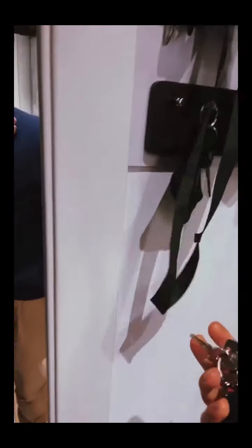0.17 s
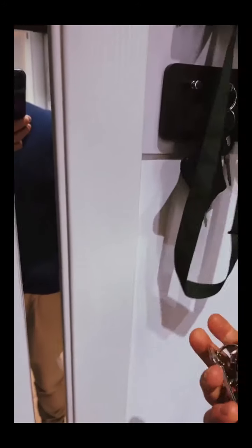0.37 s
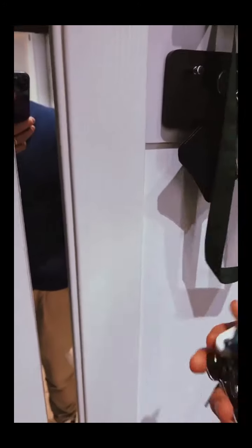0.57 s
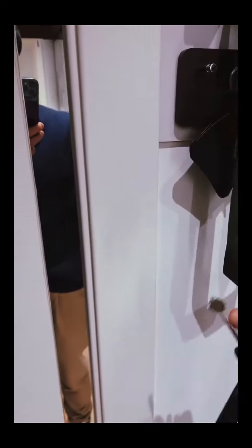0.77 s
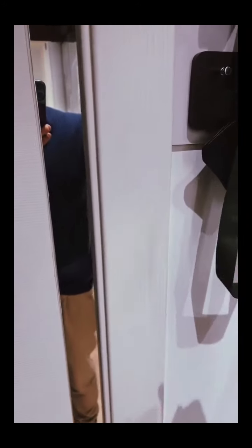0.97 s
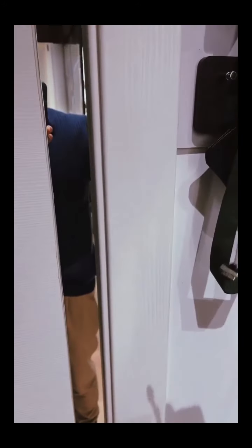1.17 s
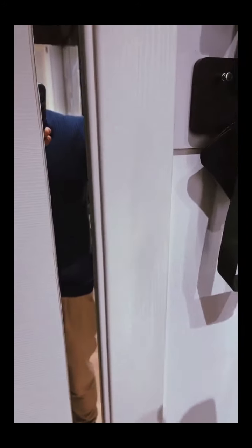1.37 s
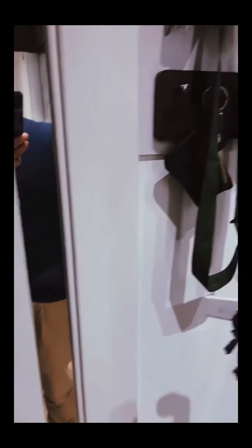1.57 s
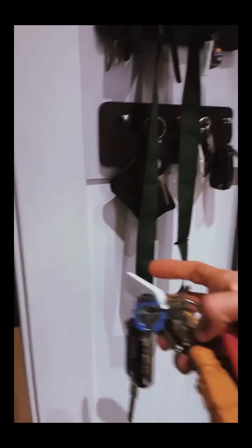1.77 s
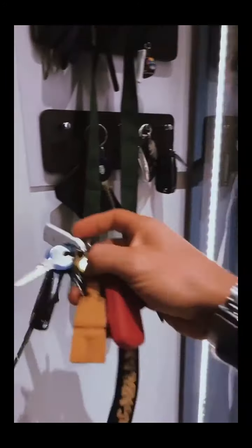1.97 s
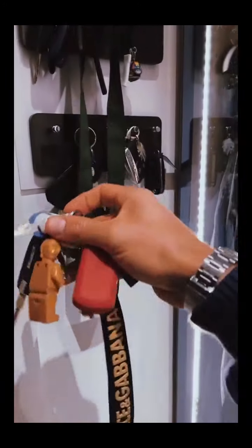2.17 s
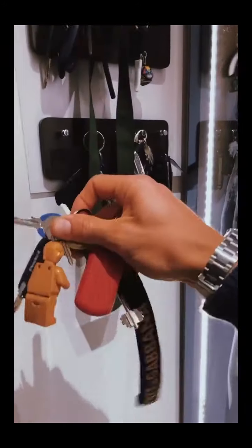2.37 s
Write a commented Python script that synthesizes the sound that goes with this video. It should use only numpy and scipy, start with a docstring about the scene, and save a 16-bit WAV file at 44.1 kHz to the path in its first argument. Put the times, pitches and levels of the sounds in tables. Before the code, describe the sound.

A bunch of keys with plastic fobs clinks and slides in a hand, close by in a small, quiet hallway. The light jingling eases briefly, then grows loudest near the end, with a few soft thumps from a lanyard.

```python
"""A bunch of keys with plastic fobs is gathered in the hand and lifted off a wall rack in a small hallway.
The keys slide over each other and knock together in short, hand-damped clinks that chatter as they
settle. Now and then one swings free and rings, or its tip flicks the key ring with a dry tick.
The lanyard gives a few soft, falling thumps as it comes away, over a low hum and quiet room air."""
import sys
import numpy as np
from scipy import signal
from scipy.fft import rfft, irfft
from scipy.io import wavfile

SR = 44100
rng = np.random.default_rng(int(sys.argv[2]) if len(sys.argv) > 2 else 0)


def transcribe(signal):
    """Save signal, clipped to [-1, 1], as a 16-bit WAV file at the path in sys.argv[1]."""
    frames = np.atleast_2d(signal).T
    limited = np.clip(frames, -1, 1)
    pcm = np.round(limited * 32767).astype(np.int16)
    wavfile.write(sys.argv[1], SR, pcm)


N = 106016

# A "fade" is the time a sound takes to drop by 60 dB. A "mode" is a pitch at which a thing likes to ring.
# Levels in the tables are starting points: the functions turn them up or down.
# Keys knocking together; body is the low part of a clink, clack the middle and treble the top:
# (time [s], clack level [dB], body above clack [dB], treble above clack [dB], chatter fade [s])
KEY_HITS = [(0.0001, -47, -26, 3.5, 0.078), (0.0212, -63, 8, 17.5, 0.051), (0.0453, -50, -33, 4.5, 0.15),
            (0.072, -49.5, -31, -2, 0.091), (0.0936, -58, -13, 10, 0.054), (0.1157, -47.5, -28, -4, 0.17),
            (0.2056, -41.5, -30, 1, 0.029), (0.2293, -59.5, 0, 15.5, 0.098), (0.2383, -51, -20, 9.5, 0.058),
            (0.2851, -53, -4, 15.5, 0.074), (0.288, -48, -11, -1, 0.12), (0.3291, -40, -4.5, 7.5, 0.036),
            (0.365, -49.5, 0, 2.5, 0.038), (0.4223, -37, -13, 3, 0.018), (0.431, -37.5, -11, 5, 0.044),
            (0.4824, -64.5, -10, 20.5, 0.071), (0.5455, -51, 3.5, 4, 0.09), (0.5522, -53.5, -10, 12, 0.048),
            (0.571, -52, -1, 5, 0.012), (0.6627, -60, 12, 12, 0.18), (0.6805, -36, -23, 4.5, 0.01),
            (0.6938, -41.5, -4, -36, 0.028), (0.7181, -51.5, 2.5, -15, 0.047),
            (0.7623, -51, 10.5, 2, 0.029), (0.779, -45.5, -24, -28, 0.013),
            (0.7965, -50.5, 6.5, 3.5, 0.022), (0.8393, -34, -40, 3.5, 0.014),
            (0.853, -54, 12.5, -16, 0.034), (0.876, -44, -3, 7.5, 0.022), (0.9078, -59, 9, 15, 0.031),
            (0.9231, -47, 1, 10, 0.048), (0.9903, -65, 16.5, -21, 0.017), (1.11, -49.5, -33, -1.5, 0.1),
            (1.1198, -55, 8, 3, 0.0095), (1.1581, -44, -6, -0.5, 0.029), (1.1978, -44.5, -12, 5.5, 0.059),
            (1.233, -47, -13, 2.5, 0.098), (1.2452, -46, -30, -3, 0.11), (1.2542, -46, -3, 6.5, 0.021),
            (1.2884, -49.5, -19, -8, 0.063), (1.3078, -50.5, 12.5, 9.5, 0.022),
            (1.3734, -49.5, -4, -22, 0.023), (1.3892, -48.5, -12, 4, 0.033), (1.3971, -46, -28, 3.5, 0.013),
            (1.4189, -49.5, -4, 7, 0.047), (1.4634, -50, -1, 3.5, 0.061), (1.4902, -46.5, -10, 5, 0.019),
            (1.5085, -46, -3, -6, 0.026), (1.523, -43.5, -31, -12, 0.011), (1.5365, -50.5, 1, 0, 0.037),
            (1.6108, -49, 3.5, 3, 0.069), (1.634, -53, 9, 6.5, 0.029), (1.677, -51.5, 6, -30, 0.11),
            (1.737, -48, 0.5, 2.5, 0.028), (1.7497, -50.5, 15, 3.5, 0.0099),
            (1.8166, -47.5, -21, 3.5, 0.012), (1.8289, -40.5, -34, -1.5, 0.0084),
            (1.8505, -56.5, 13, -16, 0.017), (1.8627, -50, -2.5, 3.5, 0.099), (1.918, -46, -3.5, -16, 0.09),
            (1.932, -42, -19, 1, 0.037), (1.9369, -41, 2.5, 4.5, 0.14), (1.9469, -43.5, 8.5, 0, 0.058),
            (1.9542, -43, 8, -13, 0.03), (1.966, -35.5, -9, -9, 0.028), (1.9884, -38, -1, -1.5, 0.029),
            (2.0225, -53.5, 19.5, -4, 0.0098), (2.0447, -41.5, -13, 3, 0.025),
            (2.0872, -26.5, -0.5, -9.5, 0.017), (2.0964, -40, 7, -23, 0.037),
            (2.1146, -43.5, -5, -1, 0.095), (2.1279, -35.5, -1.5, 0, 0.062), (2.135, -27.5, -9, -3, 0.036),
            (2.142, -33, 3, 0.5, 0.069), (2.1619, -36, -9, -14, 0.034), (2.1685, -29, -7.5, -3, 0.035),
            (2.1828, -31.5, -15, -19, 0.031), (2.1868, -38, 0, -14, 0.0081),
            (2.2072, -40.5, -2.5, 1.5, 0.055), (2.2862, -48.5, -24, -35, 0.034),
            (2.301, -41, -33, 1, 0.018), (2.3152, -39.5, 8, -5, 0.04), (2.3448, -42.5, -25, -1, 0.097),
            (2.3499, -43.5, 0, -4, 0.024), (2.3864, -32.5, -20, 1, 0.035)]
# Low modes of the held bunch: (pitch [Hz], width [Hz], level [dB])
BODY = [(1558, 270, 2), (1750, 335, -2)]
# Middle modes of the held bunch: (pitch [Hz], width [Hz], level [dB])
CLACK = [(2333, 820, 7), (2962, 670, -1.5), (3466, 290, 4)]
# High modes of the held bunch: (pitch [Hz], width [Hz], level [dB])
TREBLE = [(4976, 1080, 4.5), (6080, 1500, 5), (7500, 2300, 3), (8160, 3500, -1), (10520, 220, 6),
          (11540, 820, 0), (12550, 2050, 1)]
# Dull modes of the plastic fobs: (pitch [Hz], width [Hz], level [dB])
FOB_MODES = [(378, 350, -5), (750, 380, -11)]
# Keys sliding over each other: (time [s], level [dB], treble above the rest [dB])
SLIDE_CURVE = [(0, -60, 1), (.15, -51, 7.5), (.19, -59.5, 3.5), (.25, -54.5, 0.5), (.38, -50.5, 1.5),
               (.41, -60.5, 4), (.46, -62, 5), (.52, -53.5, -11), (.56, -63, 15.5), (.63, -70.5, -15),
               (.72, -59.5, 10), (.82, -57, -7.5), (.87, -48.5, 2), (.96, -61, -1.5), (1.06, -70, -2),
               (1.15, -64.5, -2), (1.25, -49.5, -15), (1.35, -61, -3), (1.5, -56, -4.5), (1.58, -57, -7),
               (1.715, -63.5, 0.5), (1.8, -58, -5.5), (1.91, -60, -1), (1.955, -55.5, 7),
               (2.01, -55.5, 0.5), (2.07, -49.5, -8.5), (2.16, -39.5, -2), (2.22, -55, 4.5),
               (2.27, -62.5, -3), (2.32, -46.5, -4), (2.4, -55.5, 1.5)]
# A key or fob swinging free: (time [s], pitch [Hz], level [dB], fade without the fingers [s])
FREE_RINGS = [(0.001, 11285, -48, 0.18), (0.074, 2340, -49, 0.09), (0.196, 13480, -48, 0.09),
              (0.206, 2560, -42, 0.06), (0.231, 13300, -49, 0.12), (0.287, 13880, -44, 0.14),
              (0.33, 6095, -48, 0.24), (0.335, 10105, -51, 0.2), (0.335, 13830, -46, 0.3),
              (0.425, 11285, -45, 0.18), (0.432, 2900, -45, 0.09), (0.44, 13860, -45, 0.16),
              (0.447, 10735, -48, 0.17), (0.45, 6095, -44.5, 0.22), (0.478, 10105, -51, 0.13),
              (0.481, 13800, -44, 0.1), (0.541, 10900, -50, 0.16), (0.544, 2340, -47, 0.06),
              (0.557, 13600, -46, 0.06), (0.567, 2340, -43, 0.035), (0.58, 12430, -58, 0.22),
              (0.593, 2340, -47, 0.07), (0.595, 6945, -57, 0.16), (0.681, 1870, -39, 0.05),
              (0.681, 3700, -38, 0.035), (0.84, 2400, -28, 0.018), (0.84, 3720, -28, 0.017),
              (0.923, 11200, -48, 0.1), (1.199, 6966, -45, 0.14), (1.199, 12420, -50, 0.16),
              (1.612, 6960, -45.5, 0.14), (1.75, 1520, -42, 0.035), (1.883, 12720, -51, 0.09),
              (1.938, 13300, -41, 0.12), (2.023, 1465, -42, 0.045), (2.135, 3745, -39, 0.06),
              (2.168, 9000, -40, 0.06), (2.302, 13330, -48, 0.11)]
# High modes of the key blades: (pitch [Hz])
BLADE_PITCHES = [5360, 6095, 6960, 7880, 10735, 11285, 11630, 12420, 13300, 13830]
# Tone colour of the room air: (frequency [Hz], level [dB])
AIR_COLOUR = [(20, -28), (45, -1), (70, 6.5), (110, -4.5), (170, 2), (220, -10), (500, -12), (1000, -15),
              (3000, -25), (14000, -31)]
# Rise and fall of the mains hum: (time [s], level [dB])
HUM_CURVE = [(0, -96), (1.0, -64.5), (1.55, -60.5), (1.65, -53), (1.76, -52), (1.86, -58.5), (2.15, -58),
             (2.27, -51), (2.4, -58.5)]
# The lanyard coming away: (time [s], level [dB], length [s], time until the pitch has halved [s])
LANYARD_THUMPS = [(0.892, -43, 0.0064, 0.0034), (1.058, -52.5, 0.052, 0.0047),
                  (1.757, -39.5, 0.012, 0.0015), (1.778, -40.5, 0.0051, 0.0011),
                  (1.816, -41, 0.066, 0.00357), (1.922, -42.5, 0.06, 0.00353)]
# A key tip flicking its ring: (time [s], level [dB])
TIP_TICKS = [(1.3723, -49), (1.5705, -48), (1.677, -46.5), (1.7332, -40), (1.7795, -48), (1.922, -41),
             (1.929, -44)]


def from_db(db):
    """Turn decibels into a number to multiply a sound by."""
    return 10 ** (np.asarray(db) / 20)


def rms_one(x):
    """Scale a sound so that its average strength (rms) is 1."""
    return x / np.sqrt(np.mean(x ** 2) + 1e-20)


def in_time(rows):
    """Join a table's points with straight lines, giving one value per sample."""
    times, *columns = np.transpose(rows)
    return [np.interp(np.arange(N) / SR, times, column) for column in columns]


def add(out, start, sound):
    """Mix a sound in at a start time given in seconds."""
    i = int(np.clip(start * SR, 0, N - 1))
    out[i:i + len(sound)] += sound[:N - i]


def low_noise(top_hz, shape):
    """Noise with the part above top_hz turned down."""
    lowpass = signal.butter(2, top_hz, fs=SR, output="sos")
    return rms_one(signal.sosfilt(lowpass, rng.standard_normal(shape)))


def mode_filter(hz, width_hz):
    """A filter that rings at one pitch: the narrower it is, the longer it rings."""
    r = np.exp(-np.pi * width_hz / SR)
    return [(1 - r * r) / 2, 0, (r * r - 1) / 2, 1, -2 * r * np.cos(2 * np.pi * hz / SR), r * r]


def resonate(force, modes, detune=0.053, spread_db=1.5):
    """Make modes ring. Pitch and strength vary, as each contact strikes another key at another spot."""
    out = 0
    for (hz, width_hz, db), (shift, louder) in zip(modes, rng.standard_normal((len(modes), 2))):
        pitch = hz * (1 + detune * shift)
        peak = mode_filter(pitch, width_hz)
        steep_sides = mode_filter(pitch, width_hz + hz / 2)
        out = out + from_db(db + spread_db * louder) * signal.sosfilt([peak, steep_sides], force + 1e-18)
    return out


def clinks(size=3000, rise_s=.0006, strike_fade_s=.0039, bounces_per_s=4000, heavy_db=-39.5):
    """A strike and its tiny dying bounces shake keys and fobs; returns the metal and the plastic sound."""
    metal, fobs, t = np.zeros(N), np.zeros(N), np.arange(size) / SR
    for start, db, body_db, treble_db, fade_s in KEY_HITS:
        strike = rng.standard_normal(size) * from_db(-60 * t / strike_fade_s) * (1 - np.exp(-t / rise_s))
        bounces = rng.standard_normal(size) * (rng.random(size) < bounces_per_s / SR)
        force = strike / np.linalg.norm(strike) + bounces * from_db(-1 - 60 * t / fade_s)
        length = SR * (.003 + fade_s / np.log(1e6))   # in samples: a longer clink gets more energy
        # Louder contacts come from heavier pieces, which sound duller.
        loss_db_per_octave = 0.8 * max(db - heavy_db, 0)
        treble = [(hz, width_hz, mode_db - loss_db_per_octave * np.log2(hz / TREBLE[0][0]))
                  for hz, width_hz, mode_db in TREBLE]
        knock_db = db - 17.5 + np.clip(body_db, -10, 10) / 2   # more body, more knock
        for out, modes, level_db in ((fobs, FOB_MODES, knock_db),
                                     (metal, BODY, db + body_db - 2.9),
                                     (metal, CLACK, db + 1.52),
                                     (metal, treble, db + treble_db - 2.29)):
            sound = resonate(force, modes)
            add(out, start, from_db(level_db) * np.sqrt(length) * sound / np.linalg.norm(sound))
    return metal, fobs


def sliding(key_count=6, slips_per_s=1200, spread_db=1.5):
    """Rubbing keys slip in tiny ticks: crowded when pressed hard, separate when touching lightly."""
    db, treble_db = in_time(SLIDE_CURVE)
    density = np.sqrt(from_db(db - db.mean()))   # scales the slip rate; 1 at the average level
    low, high = 0, 0
    for _ in range(key_count):
        sizes = from_db(spread_db * np.minimum(rng.exponential(1, N), 2))
        directions = rng.choice([-1, 1], N)
        slipping = rng.random(N) < slips_per_s * density / key_count / SR
        slips = sizes * directions * slipping / np.sqrt(density)
        low = low + resonate(slips, BODY + CLACK)
        high = high + resonate(slips, TREBLE)
    return from_db(db - 2) * (rms_one(low) + from_db(treble_db) * rms_one(high))


def free_keys(rise_s=.0012, finger_damping_db_per_s=35, buzz_depth=.35):
    """A loose key rings at one pitch and buzzes against its neighbours while the fingers damp it."""
    out, t = np.zeros(N), np.arange(SR // 2) / SR
    for start, hz, db, fade_s in FREE_RINGS:
        level_buzz, phase_buzz = buzz_depth * low_noise(top_hz=120, shape=(2, len(t)))
        phase = 2 * np.pi * hz * t
        tone = (1 + level_buzz) * np.sin(phase) + phase_buzz * np.cos(phase)
        loudness = from_db(db + 5 - (60 / fade_s + finger_damping_db_per_s) * t)
        add(out, start, loudness * (1 - np.exp(-t / rise_s)) * tone)
    return out


def blade_shimmer(jolts, width_hz=30, gain_db=2):
    """Every jolt leaves the key blades shimmering faintly on their high modes."""
    return from_db(gain_db) * sum(signal.sosfilt([mode_filter(hz, width_hz)], jolts)
                                  for hz in BLADE_PITCHES)


def hallway_echo(sound, fade_s=0.2, gap_s=0.0044, top_hz=7400, gain_db=-11.5):
    """The nearby walls send the sound back as a short, blurred, slightly dull echo."""
    t = np.arange(SR // 2) / SR
    tail = rng.standard_normal(len(t)) * from_db(-60 * t / fade_s) * (t > gap_s)
    lowpass = signal.butter(1, top_hz, fs=SR, output="sos")
    dull_tail = signal.sosfilt(lowpass, tail / np.linalg.norm(tail))
    return from_db(gain_db) * signal.fftconvolve(sound, dull_tail)[:N]


def room_air(level_db=-62.5):
    """The air in the room is a quiet, steady noise, strongest in the bass."""
    hz, db = np.transpose(AIR_COLOUR)
    frequencies = np.fft.rfftfreq(N, 1 / SR)
    colour = from_db(np.interp(np.log(frequencies + 1), np.log(hz), db))
    air = irfft(rfft(rng.standard_normal(N)) * colour, N)
    return from_db(level_db) * rms_one(air)


def mains_hum(hz=59.6):
    """Mains electricity hums on one low note that swells and sinks."""
    db, = in_time(HUM_CURVE)
    return from_db(db) * rms_one(np.sin(2 * np.pi * hz * np.arange(N) / SR))


def lanyard(start_hz=720, wobble_depth=.45, rustle_db=-11, rustle_fade_s=.07):
    """The strap rustles and gives soft, uneven thumps whose pitch drops quickly into the bass."""
    out, t = np.zeros(N), np.arange(SR // 4) / SR
    for start, db, length_s, fall_s in LANYARD_THUMPS:
        hz = start_hz / (1 + t / fall_s)
        rise = 1 - np.exp(-t / (2.5 * fall_s))
        swell = rise / (1 + (t / length_s) ** 10)   # dies quickly after length_s
        wobble = 1 + wobble_depth * low_noise(top_hz=70, shape=len(t))
        thump = swell * wobble * np.sin(2 * np.pi * np.cumsum(hz) / SR)
        rustle = from_db(rustle_db - 60 * t / rustle_fade_s) * low_noise(top_hz=700, shape=len(t))
        add(out, start, from_db(db) * (thump + rustle))
    return out


def tip_ticks(size=600, fade_s=0.0062):
    """A key tip flicks its ring: one light touch with no chatter, less damped than a clink."""
    out, t = np.zeros(N), np.arange(size) / SR
    narrow_modes = [(hz, width_hz / 2, db) for hz, width_hz, db in TREBLE]
    length = SR * fade_s / np.log(1e6)
    for start, db in TIP_TICKS:
        touch = rng.standard_normal(size) * from_db(-60 * t / fade_s)
        sound = resonate(touch, narrow_modes, spread_db=3)
        add(out, start, from_db(db) * np.sqrt(length) * sound / np.linalg.norm(sound))
    return out


def scene(low_edge_hz=1218):
    """Mix the nearby keys and their lanyard with the hallway behind them."""
    metal, fobs = clinks()
    jolts = metal + tip_ticks() + sliding()
    # Small keys give off very little low sound.
    highpass = signal.butter(6, low_edge_hz, "high", fs=SR, output="sos")
    keys = signal.sosfilt(highpass, jolts + free_keys() + blade_shimmer(jolts)) + fobs
    mix = keys + hallway_echo(keys) + lanyard() + room_air() + mains_hum()
    return mix[None]   # one channel


def record(dry):
    """Cut away the very highest treble steeply."""
    top_hz = 13950
    return signal.sosfilt(signal.ellip(10, .3, 75, top_hz, fs=SR, output="sos"), dry)


dry = scene()
out = record(dry)
transcribe(out)
```